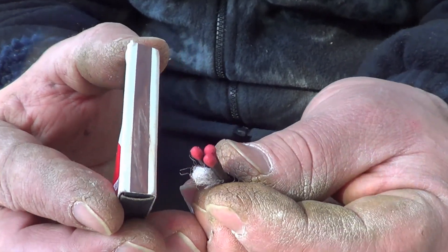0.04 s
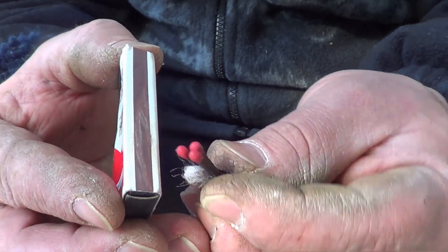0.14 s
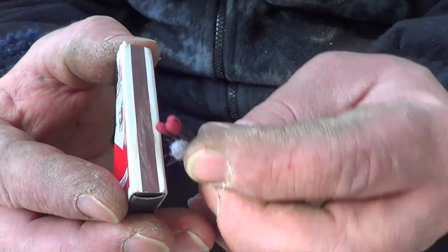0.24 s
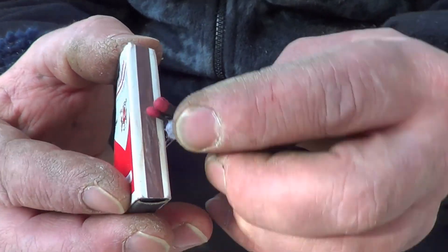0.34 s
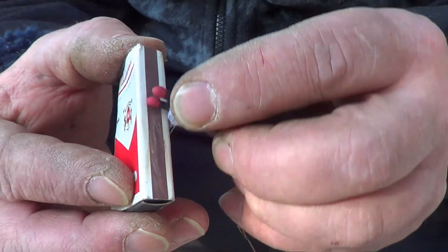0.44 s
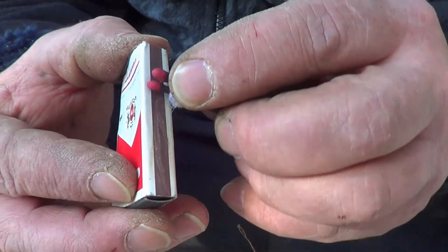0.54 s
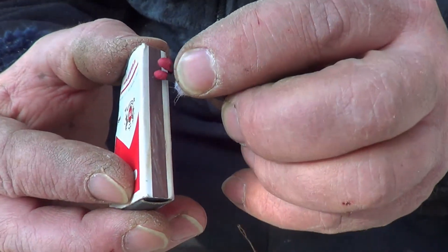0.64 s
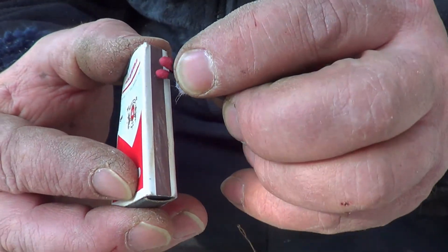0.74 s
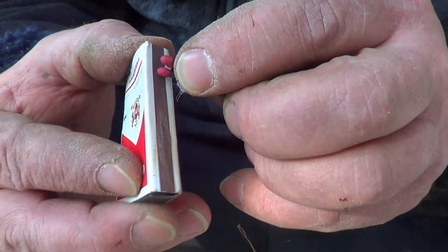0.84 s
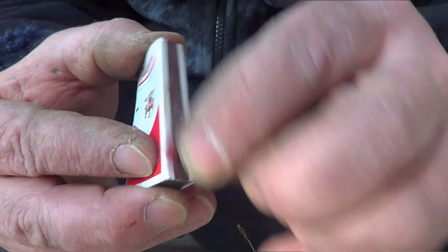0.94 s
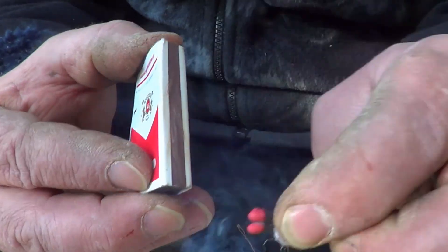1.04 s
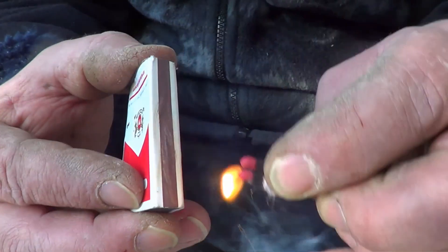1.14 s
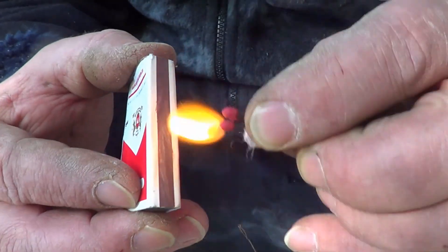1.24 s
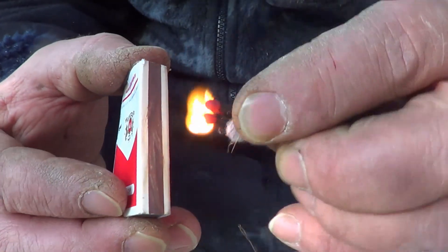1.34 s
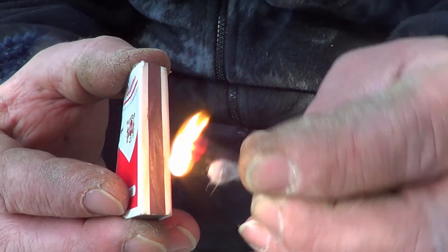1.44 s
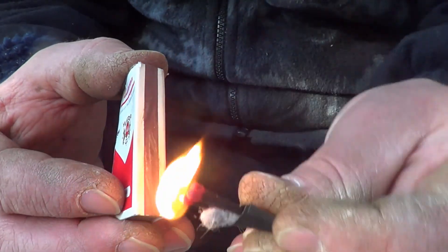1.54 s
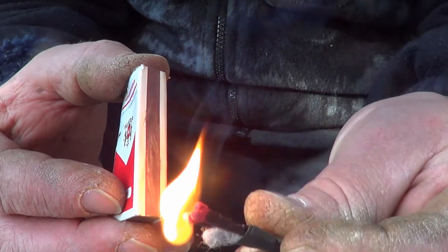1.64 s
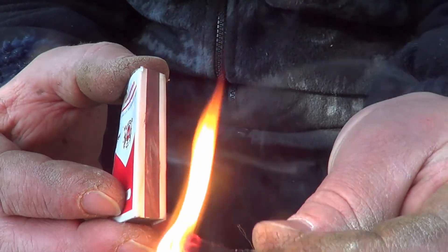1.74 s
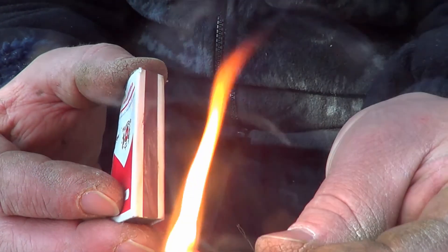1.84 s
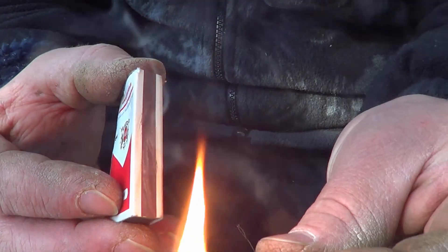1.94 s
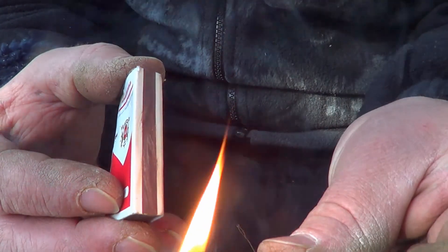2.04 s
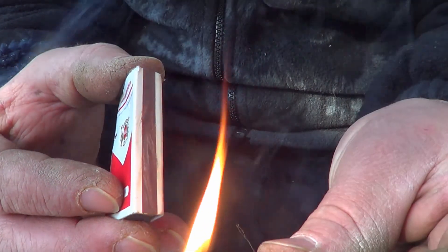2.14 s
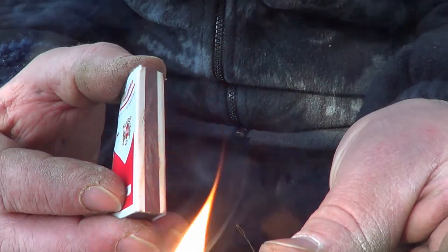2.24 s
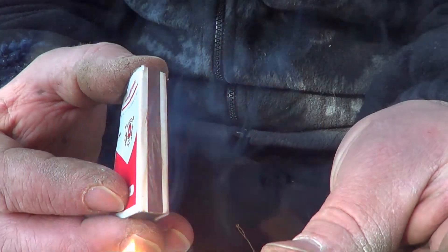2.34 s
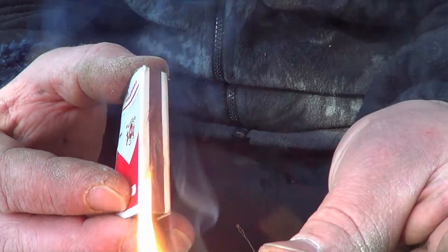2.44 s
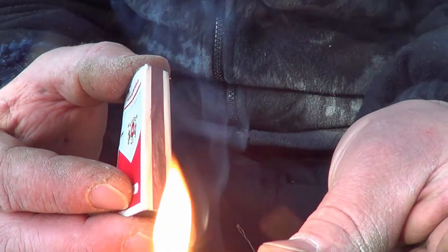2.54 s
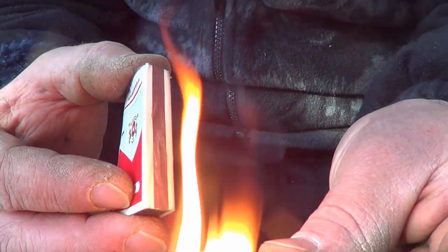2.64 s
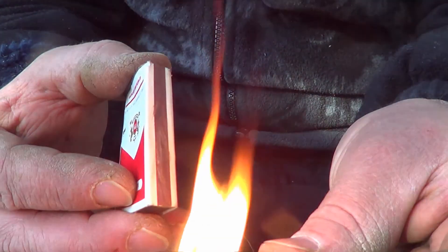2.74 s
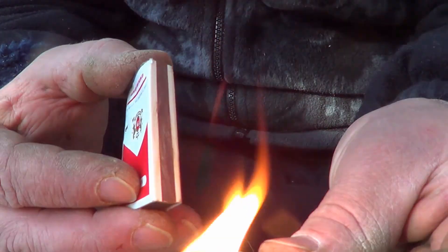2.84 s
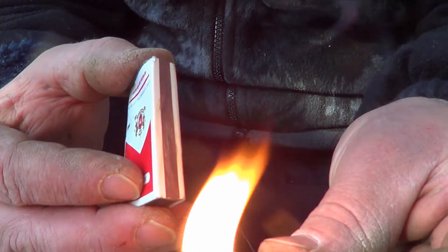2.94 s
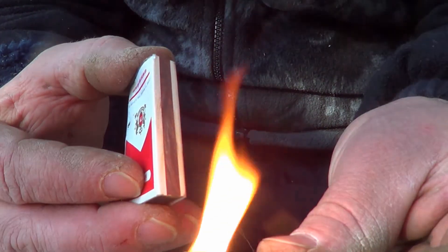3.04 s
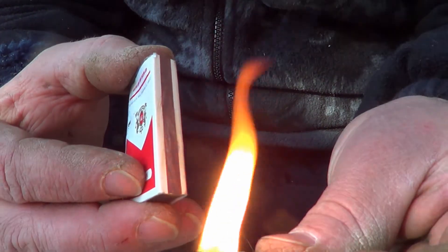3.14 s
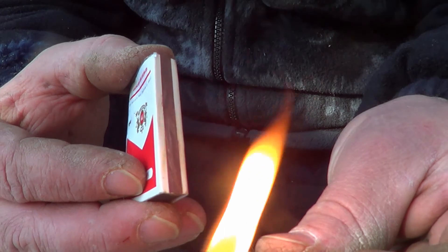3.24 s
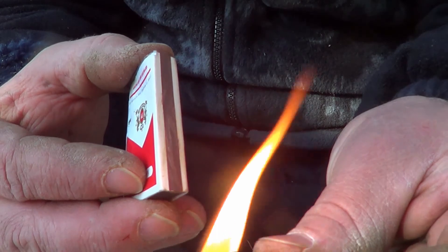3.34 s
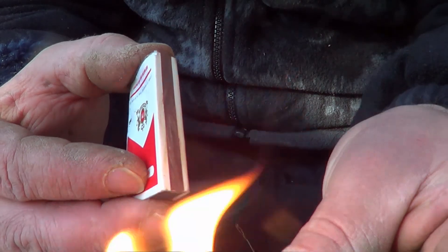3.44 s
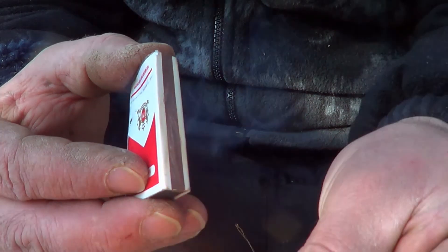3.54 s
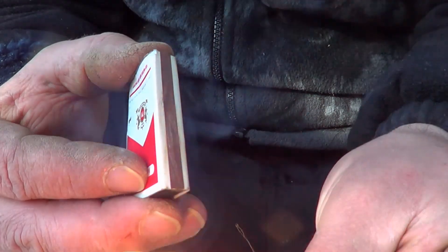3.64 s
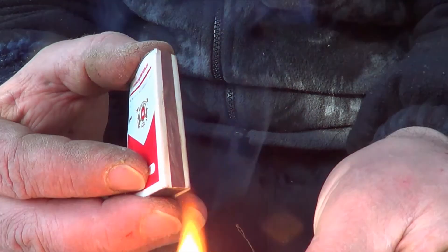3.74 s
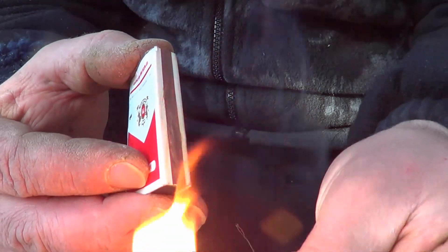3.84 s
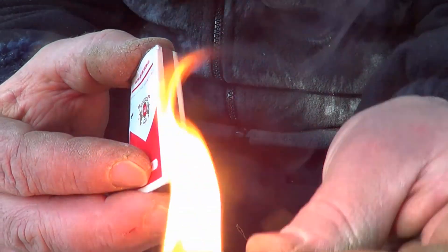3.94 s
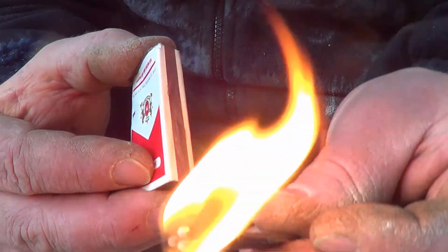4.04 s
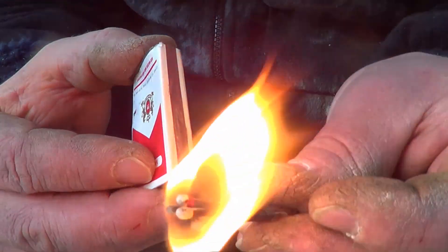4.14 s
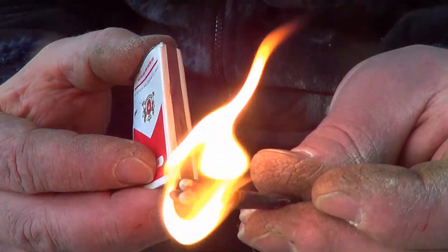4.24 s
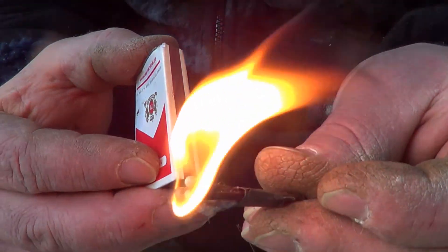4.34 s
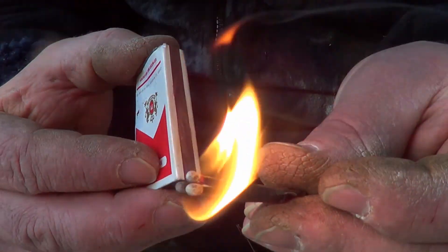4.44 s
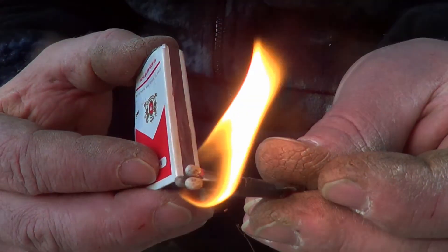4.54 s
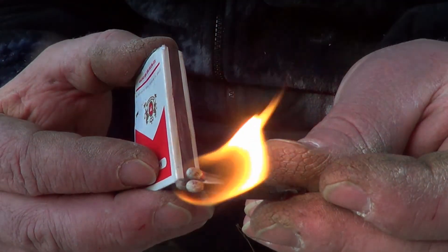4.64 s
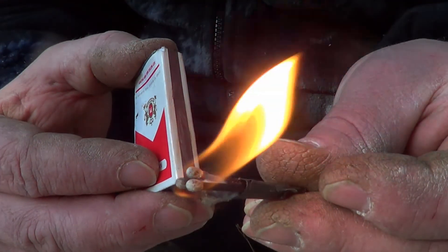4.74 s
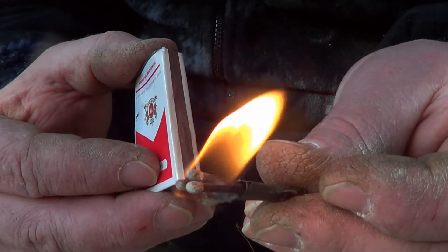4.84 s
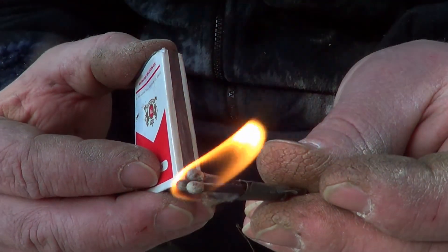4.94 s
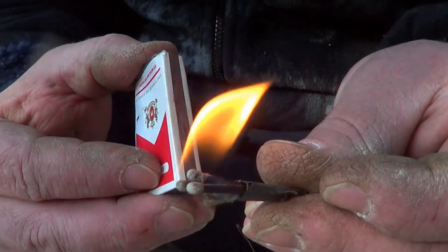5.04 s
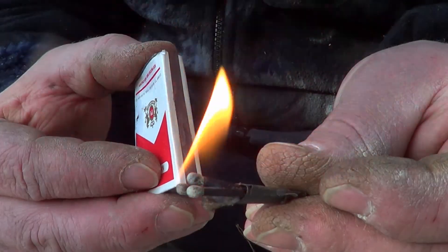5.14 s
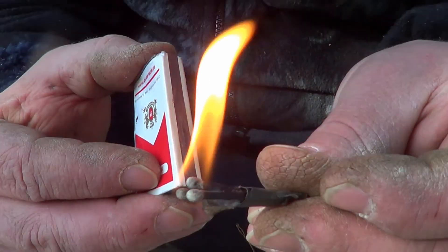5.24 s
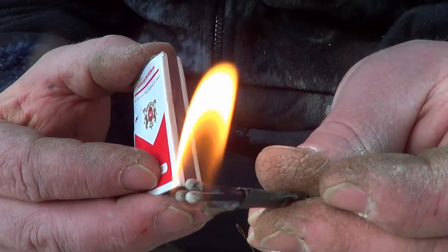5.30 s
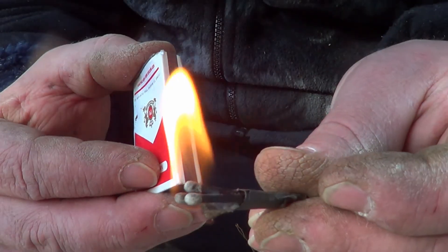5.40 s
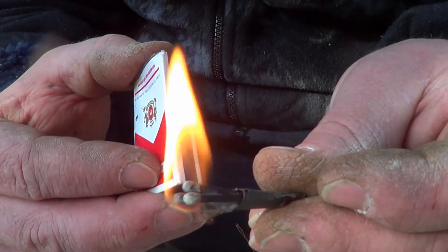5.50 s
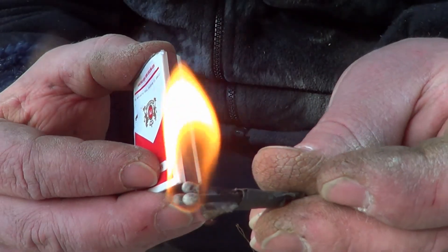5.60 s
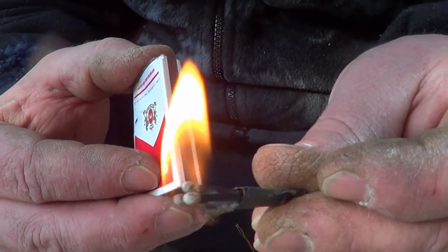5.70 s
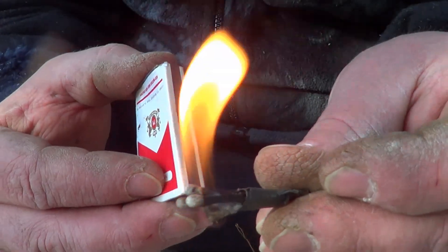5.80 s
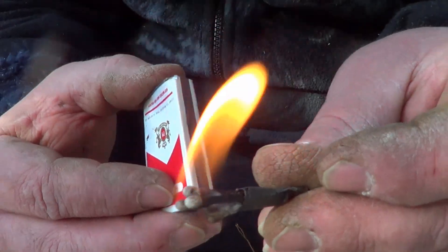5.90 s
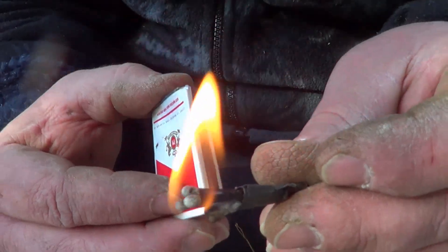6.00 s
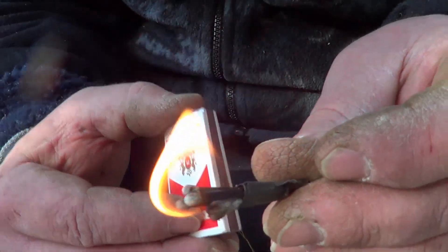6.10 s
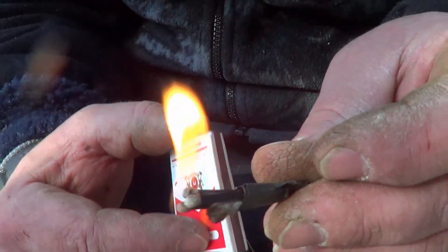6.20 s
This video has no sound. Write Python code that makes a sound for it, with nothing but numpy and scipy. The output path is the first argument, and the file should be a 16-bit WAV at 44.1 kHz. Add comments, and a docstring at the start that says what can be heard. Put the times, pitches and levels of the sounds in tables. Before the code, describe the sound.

Dry little scrapes and catches ring a small cardboard box, ending in a sharp cluster of strike snaps. The match heads light one after another with sputtering, high fizz, fluttering gas puffs and crackles, then dwindle to quiet sizzling and stray ticks. A crisp spit comes late from the right, a weaker one near the end. Close microphone, dry and outdoors, with quiet air, a thin high whine and a brief faint early hum.

```python
"""Outdoors, close to a camera: a bundle of matches scrapes along its box and is struck.
Friction grains and sharp catches excite the resonances of the hollow box.
The heads flare one after another: showers of tiny gas bursts, shaped noise, over a hissing resonant jet.
Each flare burns out into a fading, crackling afterglow; stray pops and two spits from the right follow.
A low hum swells twice early on, and a thin high whine lies over still air."""
import sys
import numpy as np
from scipy import signal
from scipy.fft import rfft, irfft, next_fast_len
from scipy.io import wavfile
from scipy.ndimage import map_coordinates

SR = 44100
rng = np.random.default_rng(int(sys.argv[2]) if len(sys.argv) > 2 else 0)


def dump_mix(stems):
    """Bounce the given channels to the path in sys.argv[1] as a 16-bit WAV at rate SR."""
    frames = np.atleast_2d(stems).T  # one column per channel
    limited = np.clip(frames, -1, 1)  # hard clip at full scale
    pcm = np.round(limited * 32767).astype(np.int16)
    wavfile.write(sys.argv[1], SR, pcm)


N = 276198  # length in samples

# Heads flaring up; the levels are drives, ahead of the gains of each sound:
# start_s, swell_s, hold_s, burnout_db_per_s, fizz_db, flutter_db, glow_db, fading_db_per_s
FLAMES = [(1.034, .01, 0.018, 96, -46.5, -69, -47.5, 10), (1.26, 0.22, 0.032, 130, -46, -46, -52.5, 15),
          (1.668, .23, 0.019, 232, -37.5, -42.5, -45.5, 22), (2.299, .16, .185, 103.5, -30, -37, -45, 12.5),
          (3.494, .01, 0.12, 114, -35, -41.5, -53.5, 21), (3.641, 0.036, 0.011, 111, -33, -37, -46.5, 6)]
# Colour of the puff that a gas burst gives the flame: frequency_hz, level_db
PUFF_COLOUR = [(40, -53), (90, -31.5), (170, -10), (300, -10.5), (550, -1), (850, 2), (1250, -4.5),
               (1650, 1.3), (2200, -4), (3200, -10), (6000, -42.5), (16000, -59)]


def amp(db):
    """Level law: decibels to an amplitude ratio."""
    return 10 ** (np.asarray(db) / 20)


def unit(x):
    """Normalisation: scale to an rms of 1."""
    return x / np.sqrt(np.mean(x ** 2) + 1e-20)


def along(points, hz):
    """Interpolation of (frequency, value) points on a logarithmic frequency axis."""
    f, v = np.transpose(points)
    return np.interp(np.log(hz + 1), np.log(f + 1), v)


def wobble(rate):
    """Slow random modulation: a smooth curve through `rate` random knots a second."""
    knots = rng.standard_normal(int(N * rate / SR) + 4)
    return map_coordinates(knots, [np.arange(N) * rate / SR])


def filtered(x, response):
    """Linear filtering: the spectrum of x times a response of frequency."""
    size = next_fast_len(x.shape[-1] + 8192)
    spectrum = rfft(x, size) * response(np.fft.rfftfreq(size, 1 / SR))
    return irfft(spectrum, size)[..., :x.shape[-1]]


def ringing(x, gain, size=2048):
    """Minimum-phase filtering: a causal response of energy 1 whose spectrum has the shape of gain(hz)."""
    cepstrum = irfft(np.log(gain(np.fft.rfftfreq(size, 1 / SR)) + 1e-6))
    # folding the cepstrum onto positive times makes the response causal
    folded = 2 * cepstrum * (np.arange(size) < size // 2)
    pulse = irfft(np.exp(rfft(folded)))
    return signal.oaconvolve(x, pulse / np.linalg.norm(pulse))[:len(x)]


def coloured(x, spectrum):
    """Spectral colour: x through a causal filter given by (frequency, level) points."""
    return ringing(x, lambda hz: amp(along(spectrum, hz)))


def tilted(x, slope_db):
    """Spectral tilt: slope_db per octave about 6 kHz, levelling off below 1.2 kHz."""
    return filtered(x, lambda hz: amp(slope_db * np.log2(np.maximum(hz, 1200) / 6000)))


def add(track, s, x):
    """Superposition: mix x into the track at time s."""
    i = max(round(s * SR), 0)
    track[i:i + len(x)] += x[:max(len(track) - i, 0)]


def click(tail_db, decay, size=1024):
    """Impulsive source: an impulse and its exponentially dying scatter, energy 1."""
    scatter = rng.standard_normal(size) * np.exp(-np.arange(size) / SR / decay)
    x = signal.unit_impulse(size) + amp(tail_db) * scatter / np.linalg.norm(scatter)
    return x / np.linalg.norm(x)


def grains(rate, spread_db):
    """Shot noise: random impulses of scattered size, `rate` a second, mean power 1."""
    chance = np.clip(rate / SR, 1e-4, 1)
    sizes = unit(amp(spread_db * np.minimum(rng.standard_normal(N), 2)))
    return (rng.random(N) < chance) * sizes / np.sqrt(chance)


def swell(s, rise, fall):
    """Exponential growth to 1 at time s, then exponential decay."""
    t = np.arange(N) / SR - s
    return np.exp(-np.where(t < 0, -t / rise, t / fall))


def hum(sag_hz_per_s=300):
    """Frequency glide: a faint tone, roughened by random modulation, sags through each swell."""
    # peak_s, half_length_s, pitch_hz (at the peak), level_db
    hum_swells = [(0.174, 0.04, 210, -65.5), (.445, 0.057, 207, -62.5)]
    out = np.zeros(N)
    for s, length, hz, db in hum_swells:
        t = np.arange(N) / SR - s
        phase = 2 * np.pi * (hz * t - .5 * sag_hz_per_s * t ** 2)
        rough_tone = (1 + wobble(60.3)) * np.sin(phase) + wobble(60.3) * np.cos(phase)
        out += amp(db) * np.exp(-.5 * (t / length) ** 2) * unit(rough_tone)
    return out


def background(air_db=-56.5, whine_db=-63.5, whine_hz=15734):
    """Partly coherent noise for the still outdoor air, with a low hum and the camera's thin whine."""
    # Colour of the outdoor air: frequency_hz, level_db
    air_colour = [(25, -10), (60, -7), (120, -3), (200, -1.5), (500, 1.5), (1200, -0.5), (2050, -1.5),
                  (2450, 1.5), (2900, -3), (3450, -0.5), (4500, -5.5), (9300, -6), (9950, -2.5),
                  (10600, -5), (15400, -15)]
    # Left-right likeness of the air: frequency_hz, correlation (-1 to 1)
    air_likeness = [(30, .1), (120, 0.77), (500, 0.067), (2000, 0.068), (6000, 0.26), (15000, 0.92)]

    def mid_and_side(hz):
        # this angle between mid and side gives the wanted correlation of left and right
        angle = np.arccos(np.clip(along(air_likeness, hz), -1, 1)) / 2
        return amp(along(air_colour, hz)) * [np.cos(angle), np.sin(angle)]

    mid, side = filtered(rng.standard_normal((2, N)), mid_and_side)
    air = amp(air_db + 0.55 * wobble(4.26)) * unit(np.array([mid + side, mid - side]))
    whine_phase = 2 * np.pi * np.cumsum(whine_hz + 5 * wobble(30)) / SR
    whine = amp(whine_db + wobble(8)) * unit(np.sin(whine_phase))
    return air + hum() + whine


def surroundings(x, far_db=-26):
    """Reflection: hands and box scatter sideways, with scatter from the jacket and a weak longer tail."""
    # Sideways scatter from hands and box: frequency_hz, level_db
    scatter_colour = [(100, -6), (300, -15), (800, -13.5), (2000, -24.5), (6000, -24.5), (16000, -17)]
    t = np.arange(SR // 5) / SR

    def tail(t60):
        decaying = rng.standard_normal((2, len(t))) * amp(-60 * t / t60)
        return unit(decaying * (t > .0003)) / np.sqrt(len(t))

    sideways = filtered(tail(0.035)[0], lambda hz: amp(along(scatter_colour, hz)))
    near = amp(-15) * tail(.05)
    # opposite signs left and right spread the scatter to the sides
    answer = near + amp(far_db) * tail(0.14) + np.array([sideways, -sideways])
    return signal.oaconvolve(x[None], answer, axes=1)[:, :N]


def contact(x, slope_db, hz_spot, lift_db=5, sharpness=9):
    """Local contact filtering: each spot of the box has its own brightness and favours one band."""
    def favour(hz):
        return 0.76 + amp(lift_db) / (1 + (sharpness * (hz / hz_spot - 1)) ** 2)
    return filtered(tilted(x, slope_db), favour)


def matchbox():
    """Friction and modal resonance: heads grind and catch on the striker, and the hollow box rings."""
    # Heads rubbing the striker: peak_s, rise_s, fall_s, drive_db, brightness_db_per_octave, favoured_hz
    rubs = [(.3, .3, .17, -54.5, 1.5, 1680), (.313, 0.014, 0.017, -54, 4, 7000),
            (.541, 0.017, 0.013, -43, -1, 10900), (.572, 0.019, 0.016, -45.5, 0.5, 3950),
            (.589, 0.0064, 0.01, -42, -3, 5000), (0.69, 0.011, 0.0068, -33.5, 0.5, 3300),
            (.699, 0.0044, 0.0018, -37, 2.5, 11800), (0.97, 0.0013, 0.0015, -25, 2.5, 6740),
            (1.033, 0.017, 0.012, -32.5, -5, 6600), (1.057, 0.014, 0.007, -27.5, 3, 9600)]
    # Heads catching on the box: start_s, drive_energy_db, brightness_db_per_octave, favoured_hz
    snags = [(0.112, -23, -4, 1390), (0.3109, -24, 3, 14000), (.425, -29, -4, 8040),
             (.478, -16.5, 1.5, 3630), (0.5373, -20.5, -2, 4000), (0.585, -18, 1, 2190),
             (.686, -16, 2, 3200), (.758, -20, 1, 8100), (.970, -19.5, -8.5, 1680), (1.012, -4, 0.5, 3300),
             (1.0161, 1, 3, 3240), (1.0237, 2.5, -1.5, 8000), (1.0337, 1.5, -1.5, 7900),
             (1.0371, 2, 10, 6030), (1.043, -12, 10, 13000)]
    # Resonances of the cardboard box: frequency_hz, width_hz, level_db
    box_resonances = [(614, 340, -9), (930, 200, 5), (1674, 150, 14), (2174, 174, 13), (3180, 520, 11),
                      (3900, 270, 9.5), (5820, 600, 7.5), (6950, 210, 0), (8230, 480, 6.5),
                      (11100, 2400, 7.5), (11900, 840, -1), (12860, 620, 1)]
    # Broad colour of the strike, very little below 450 Hz: frequency_hz, level_db
    strike_colour = [(100, -46), (350, -35), (520, -2), (1200, -3.5), (4600, 0.5), (9000, 0.5), (12000, -3),
                     (16000, -2.5)]

    grit = grains(9000, spread_db=0.5)
    force = np.zeros(N)
    for s, rise, fall, db, slope_db, hz in rubs:
        force += amp(db) * swell(s, rise, fall) * contact(grit, slope_db, hz)
    for s, db, slope_db, hz in snags:
        add(force, s, amp(db) * contact(click(tail_db=10.0, decay=0.001), slope_db, hz))

    def strike_gain(hz):
        power = 1
        for centre, width, db in box_resonances:
            power = power + amp(db) ** 2 / (1 + (2 * (hz - centre) / width) ** 2)
        return amp(along(strike_colour, hz)) * np.sqrt(power)

    return ringing(force, strike_gain)


def spit_sound(sputter):
    """Sudden pressure release: a pocket cracks open, puffs and vents with a short hiss."""
    # start_s, snap_energy_db, puff_energy_db, hiss_drive_db, hiss_delay_s, hiss_decay_s
    bursting_pockets = [(5.0867, 0, -26.5, -33.5, 0.021, 0.025), (5.879, -5.5, -25.5, -47.5, 0.008, 0.029)]
    # Colour of a pocket splitting: frequency_hz, level_db
    crack_colour = [(300, -22), (1200, -14), (2500, -4), (5000, -2), (8500, -1), (11500, 1), (16000, -6)]
    # frequency_hz, level_db
    hiss_colour = [(300, -47.5), (2500, -11), (5000, -6.0), (8800, 4), (11500, 4), (16000, -16)]
    vent_puff_colour = [(60, -25), (250, -2), (600, 0), (1100, -9), (2000, -8), (6000, -25)]

    snaps, puffs, vents = np.zeros((3, N))
    for s, snap_db, puff_db, hiss_db, delay, decay in bursting_pockets:
        add(snaps, s, amp(snap_db) * click(tail_db=-4, decay=.0012))
        add(puffs, s, amp(puff_db) * click(tail_db=-6, decay=.002))
        burst_open = np.arange(N) > s * SR
        vents += amp(hiss_db) * swell(s + delay, delay, decay) * burst_open * sputter
    return coloured(snaps, crack_colour) + coloured(vents, hiss_colour) + coloured(puffs, vent_puff_colour)


def spits():
    """Interaural differences: from the right, so later, weaker and differently scattered on the left."""
    lag_s, right_db = .00034, 1  # the right gains this level and the left loses it
    shared = grains(7000, spread_db=3)
    left, right = (spit_sound(unit(shared + rng.standard_normal(N))) for side in range(2))
    late_left = filtered(left, lambda hz: np.exp(-2j * np.pi * hz * lag_s))
    return np.array([amp(-right_db) * late_left, amp(right_db) * right])


def opened(s):
    """Smooth transition: how far the heads have burnt open at time s, 0 to 1."""
    opens_at_s, opening_s = 1.78, .085
    return .5 + .5 * np.tanh((s - opens_at_s) / (2 * opening_s))


def fire():
    """Energy summation: flares that swell, hold and burn out into afterglows drive fizz and flutter, in dB."""
    catch_s, swell_db_per_s = .012, 37.5  # a head lights at once, then burns ever harder
    # at this glow level the flutter has this level; it loses flutter_law dB per dB of fading
    glow_ref_db, glow_flutter_db, flutter_law = -47, -54.5, 2.35
    fizz, flutter = np.full((2, N), 1e-12)  # powers
    for s, swell_s, hold_s, burnout, fizz_db, flutter_db, glow_db, fading in FLAMES:
        age = np.arange(N) / SR - s
        lit = np.clip(age / catch_s, 0, 1)
        spent = np.maximum(age - swell_s - hold_s, 0)
        blaze_db = -swell_db_per_s * np.maximum(swell_s - age, 0) - burnout * spent
        after_db = glow_db - fading * spent
        after_flutter_db = glow_flutter_db + flutter_law * (after_db - glow_ref_db)
        fizz += lit * (amp(fizz_db + blaze_db) ** 2 + amp(after_db) ** 2)
        flutter += lit * (amp(flutter_db + blaze_db) ** 2 + amp(after_flutter_db) ** 2)
    return 10 * np.log10(fizz), 10 * np.log10(flutter)


def creep():
    """Fine shot noise: the high hiss of fresh heads as the fire creeps over them."""
    # peak_s, rise_s, fall_s, level_db
    creep_swells = [(1.14, .06, 0.12, -49), (1.392, .006, .02, -46), (1.455, .015, .012, -41.5),
                    (1.56, 0.053, 0.17, -39.5), (1.69, .02, .03, -55), (4.78, 0.25, 0.28, -52.5)]
    # frequency_hz, level_db
    creep_colour = [(3000, -18), (8000, -11), (9500, -3), (11400, -5), (13000, -10), (16000, -7)]
    level = sum(amp(db) * swell(s, rise, fall) for s, rise, fall, db in creep_swells)
    alight = np.arange(N) / SR > FLAMES[0][0]
    return alight * level * coloured(grains(8000, spread_db=6), creep_colour)


def crackles(fizz_db, flutter_db, snap_spread_db=5.5, puff_spread_db=6, count=700):
    """Random point process: bursts, more and larger in a hotter fire; rows of start_s, snap_db, puff_db."""
    full_rate_per_s, onset_db, knee_db = 50, -49, 1.13  # half the full rate at the onset fizz level
    onset_snap_db, growth = -23.5, 0.71  # snap energy at the onset; dB more per dB of fizz
    puff_over_flutter_db, fresh_softer_db = 19, 7  # heads not yet burnt open snap less

    when, luck, snap, puff = rng.random((count, 4)).T
    at = (when * N).astype(int)
    heat_db = fizz_db[at] - onset_db
    rate = full_rate_per_s * (.5 + .5 * np.tanh(heat_db / (2 * knee_db)))
    freshness = 1 - opened(at / SR)
    snap_db = onset_snap_db + growth * heat_db - fresh_softer_db * freshness
    snap_db = snap_db + snap_spread_db * (2 * snap - 1)
    puff_db = flutter_db[at] + puff_over_flutter_db + puff_spread_db * (2 * puff - 1)
    happens = luck < rate * N / SR / count
    return np.transpose([at / SR, snap_db, puff_db])[happens]


def pops(bursts, dulling=0.64, hard_db=11):
    """Impulsive radiation: single bursts snap and puff, and gas catching fire gives a dull damped whump."""
    # Gas catching fire: start_s, energy_db, pitch_hz
    ignitions = [(1.2338, -29, 664), (1.2359, -19.5, 196), (1.2362, -17.5, 553), (3.0305, -23, 351)]
    # Colour of a snap: frequency_hz, level_db
    snap_colour = [(300, -30.5), (1200, -10), (2200, -6.5), (3600, -1), (4600, -4), (6500, 0), (9000, 6),
                   (11000, -0.5), (13500, -2), (16000, -18)]

    snaps, puffs, whumps = np.zeros((3, N))
    for s, snap_db, puff_db in bursts:
        # a slower burst is more puff, and its snap is duller
        slope_db = -dulling * np.clip(hard_db + puff_db - snap_db, 0, 10)
        add(snaps, s, amp(snap_db) * tilted(click(tail_db=-5.5, decay=0.0011), slope_db))
        add(puffs, s, amp(puff_db + 1.5) * click(tail_db=6.5, decay=0.0012))
    t = np.arange(SR // 20) / SR
    for s, db, hz in ignitions:
        push = t * np.sin(2 * np.pi * hz * t) * np.exp(-2.2 * hz * t)
        add(whumps, s, amp(db) * push / np.linalg.norm(push))
    return coloured(snaps, snap_colour) + coloured(puffs, PUFF_COLOUR) + whumps


def jet(fizz_db, wide_hz=1200, narrow_hz=520, weak_db=-58):
    """Resonance driven by sputtering gas: its band sinks as heads burn open and narrows in weak flow."""
    fresh_hz, open_hz, over_fizz_db = 11300, 8610, -5.5
    share = opened(np.arange(N) / SR)
    centre_hz = fresh_hz + (open_hz - fresh_hz) * share
    db = fizz_db + over_fizz_db
    carrier = np.exp(2j * np.pi * np.cumsum(centre_hz) / SR)

    def band(width_hz):
        # shift the moving band down to 0 Hz, filter there with two equal poles, and shift it back
        pole = np.exp(-2 * np.pi * width_hz / SR)
        shifted = grains(3500, spread_db=8) / carrier
        resonance = signal.lfilter([1], np.poly([pole, pole]), shifted)
        return unit((resonance * carrier).real)

    narrow = 1 / (1 + amp(db - weak_db) ** 2)
    hiss = np.sqrt(1 - narrow) * band(wide_hz) + np.sqrt(narrow) * band(narrow_hz)
    return share ** .3 * amp(db + 0.98 * wobble(40)) * hiss


def flare(fizz_db, flutter_db, clump_db=2.5, gust_db=2):
    """Combustion noise: countless bursts, denser in a harder fire, snap as fizz and puff the flame."""
    # Colours of the fizz and of a dying head's sizzle: frequency_hz, level_db
    fizz_colour = [(300, -47.5), (1500, -9.5), (2700, -15.5), (3500, -1), (4600, -7), (5600, -3), (6900, 1),
                   (7700, -7.5), (10200, -2.5), (11500, -5.5), (13500, -5.5), (16000, -11.5)]
    sizzle_colour = [(1500, -26.5), (4800, -7.5), (6400, 0), (7500, -16), (11000, 5.5), (16000, -5.5)]

    vigour = amp(fizz_db + 31)
    bursts = unit(grains(1100 + 4500 * vigour, spread_db=5.0) * amp(clump_db * wobble(130)))
    # a dying head mostly sizzles: fine, even and high
    smooth = np.clip(1 / (1 + (vigour / 0.11) ** 2), 0, .75)
    sizzle = coloured(rng.standard_normal(N), sizzle_colour) * amp(1.5 * wobble(25))
    fizz = np.sqrt(1 - smooth) * coloured(bursts, fizz_colour) + np.sqrt(smooth) * sizzle
    eddies = unit(grains(300 + 2500 * vigour, spread_db=4) * amp(gust_db * wobble(45)))
    flutter = coloured(0.59 * bursts + 0.64 * eddies, PUFF_COLOUR)
    return amp(fizz_db - 3.0) * fizz + amp(flutter_db) * flutter


def scene():
    """Superposition: box and flame straight ahead; one fire drives the fizz, the jet and the crackle."""
    # Single gas bursts that stand out from the fizz, some strong and some soft;
    # energies ahead of the gains of each pop: start_s, snap_energy_db, puff_energy_db
    single_bursts = [(1.4998, -20, -22), (1.556, -17.5, -19), (1.649, -5.5, -18), (1.7092, -11, -17.5),
                     (1.7631, -9, -25), (1.8298, -6, -27), (1.8358, -9, -25), (1.8582, -10, -20),
                     (1.9023, -8, -25.5), (1.911, -11, -14.5), (1.9758, -16, -25), (1.9844, -7.5, -17.5),
                     (2.0228, -7.5, -22.5), (2.0364, -14, -29), (2.0459, -14, -23), (2.1159, -14, -25.5),
                     (2.3085, -11.5, -21.5), (2.639, -8, -12.5), (2.835, -7, -23.5), (2.8431, -9, -26),
                     (2.8948, -8.5, -22), (2.962, -22, -39), (2.9724, -15.5, -26), (3.0214, -21, -16.5),
                     (3.0308, -8.5, -29), (3.2895, -28, -34), (3.5092, -6.5, -16), (3.7937, -11, -26),
                     (3.84, -14.5, -39), (3.8486, -25, -21), (3.9484, -27, -25), (4.0059, -13.5, -21.5),
                     (4.0286, -16, -22.5), (4.087, -15.5, -37), (4.0913, -31, -25.5), (4.1696, -14.5, -24),
                     (4.2602, -22, -41.5), (4.278, -22, -40), (4.314, -19.5, -18), (4.3354, -15.5, -27.5),
                     (4.3944, -17, -25), (4.4055, -12, -29), (4.4187, -22, -34), (4.4925, -27, -23.5),
                     (4.734, -26, -30), (5.9569, -24.5, -46)]
    fizz_db, flutter_db = fire()
    bursts = [*single_bursts, *crackles(fizz_db, flutter_db)]
    flame = flare(fizz_db, flutter_db) + jet(fizz_db) + creep() + pops(bursts)
    centre = matchbox() + flame
    aside = spits()
    reflected = surroundings(centre + aside.mean(axis=0))
    return centre + aside + reflected + background()


def record(dry, low_cut_hz=85, top_hz=15830):
    """Band limiting: the camera thins the deep bass and keeps nothing above its band limit."""
    thin = signal.sosfilt(signal.butter(2, low_cut_hz, "high", fs=SR, output="sos"), dry)
    # the upper edge falls from full to nothing over 100 Hz
    return filtered(thin, lambda hz: np.clip((top_hz - hz) / 100 + .5, 0, 1))


dry = scene()
out = record(dry)
dump_mix(out)
```